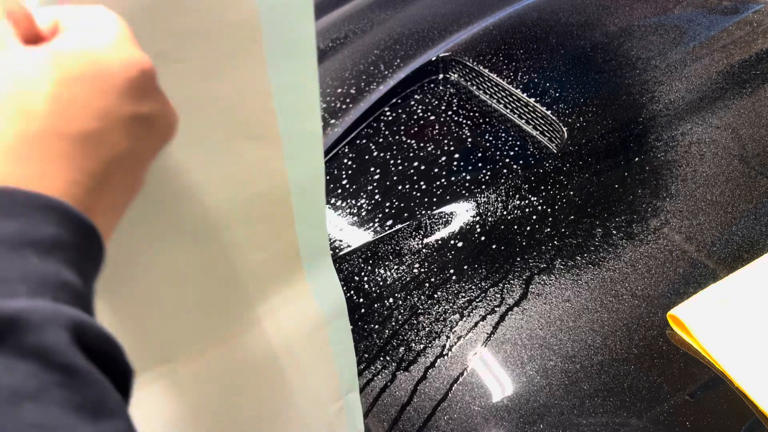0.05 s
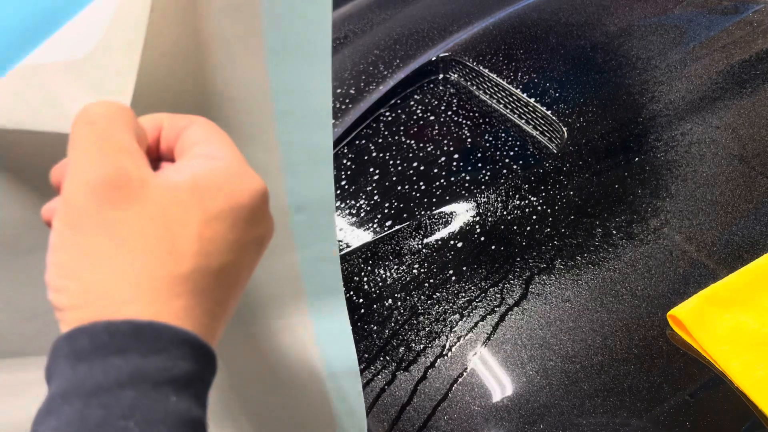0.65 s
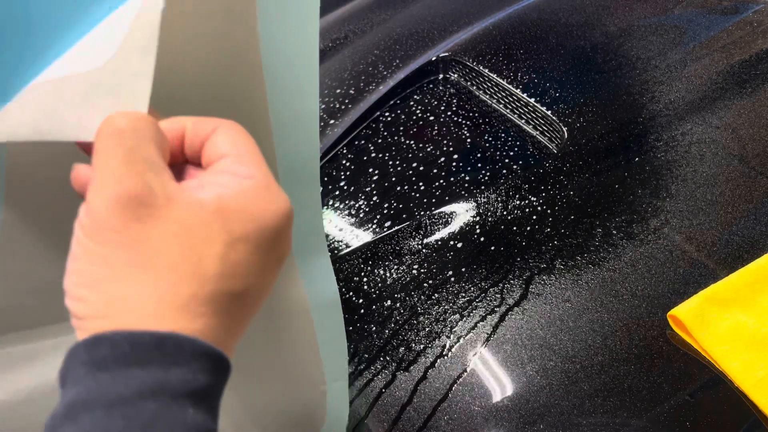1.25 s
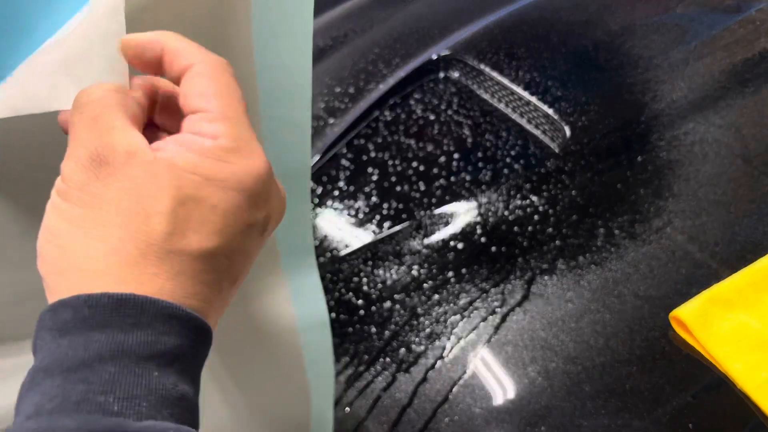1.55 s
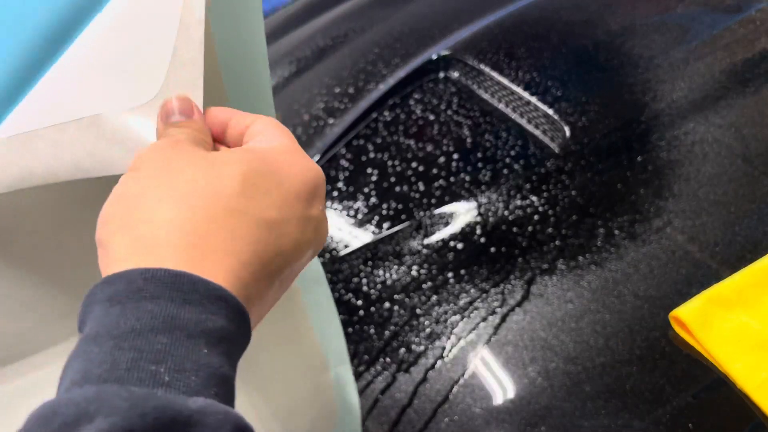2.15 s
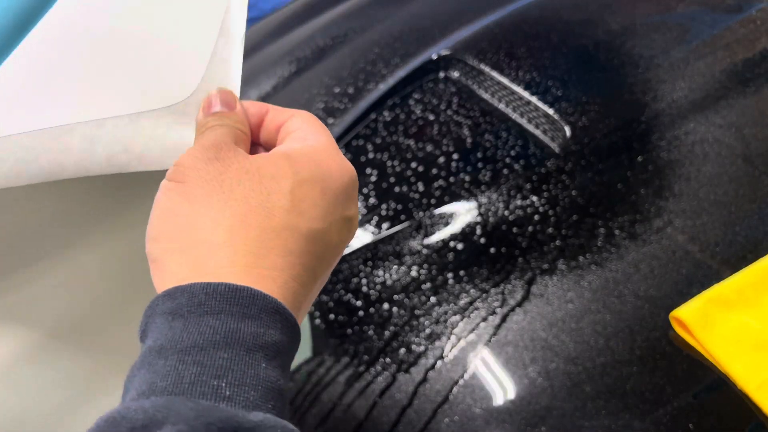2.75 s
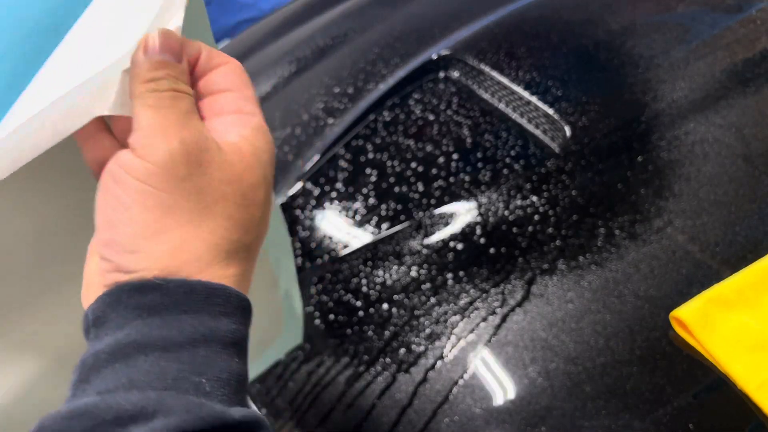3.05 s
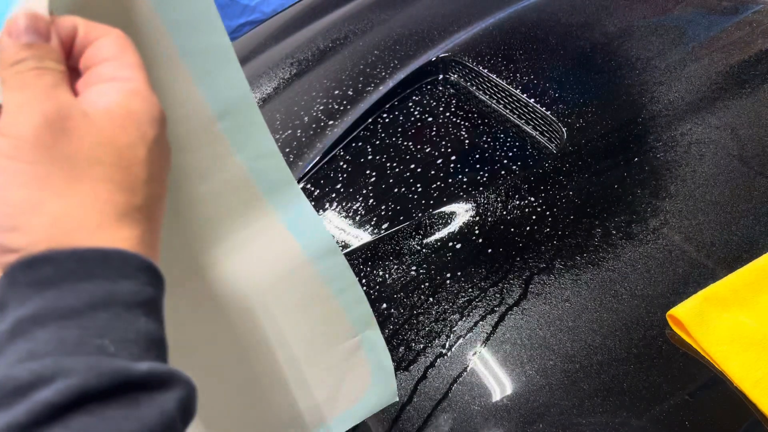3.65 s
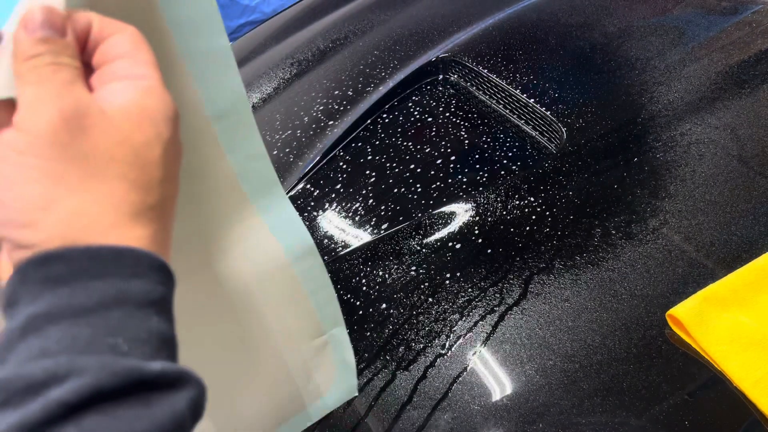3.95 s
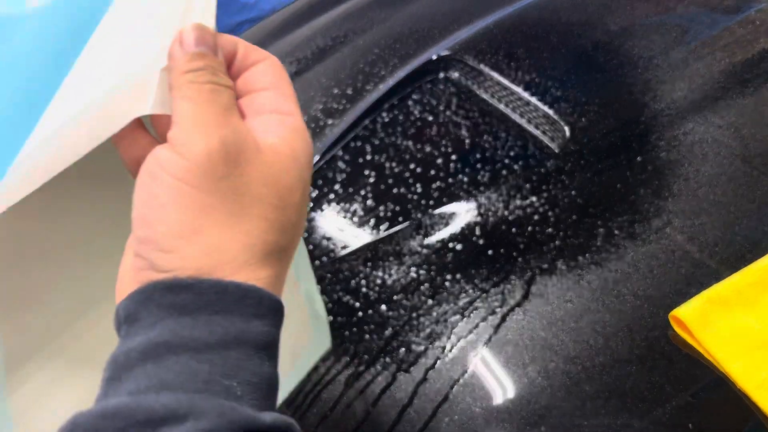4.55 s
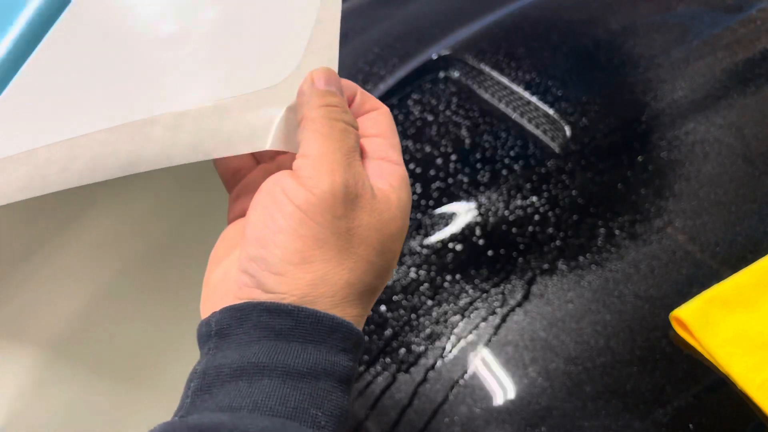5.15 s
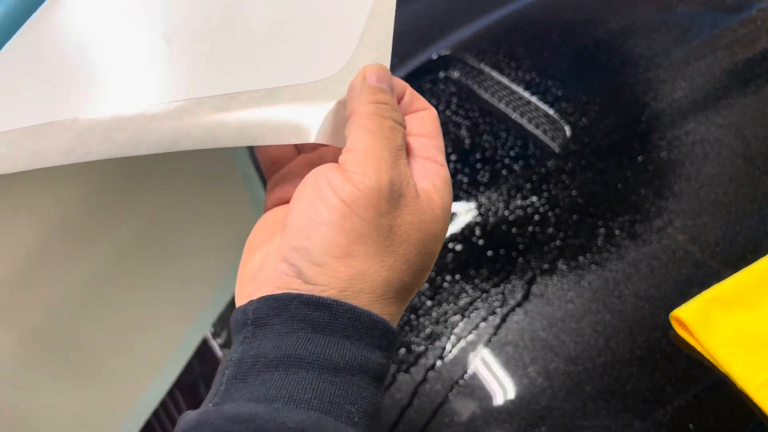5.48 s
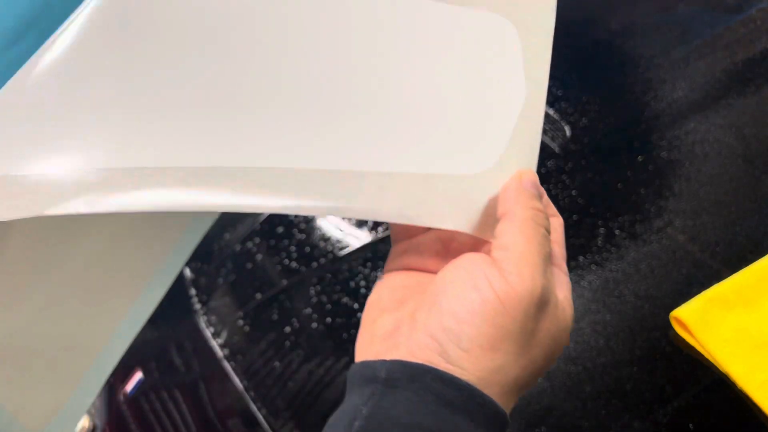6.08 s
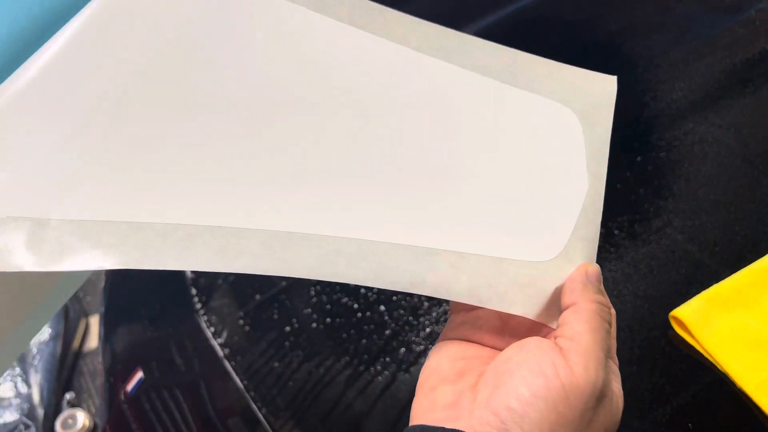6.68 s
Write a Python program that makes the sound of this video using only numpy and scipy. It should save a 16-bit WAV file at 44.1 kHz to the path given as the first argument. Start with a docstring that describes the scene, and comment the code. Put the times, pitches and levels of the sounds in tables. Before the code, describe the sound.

A large paper sheet rustles and snaps, then peels from adhesive vinyl in a long, ticking hiss, close up in a garage.

```python
"""Backing paper is peeled off sticky vinyl over a car panel in a garage; the left mic port is brighter.
Two long pulls (0.2-1.1 s, 1.9-2.9 s): glue parts in thousands of tiny pops that merge into a hiss,
while the hanging paper slides, flaps and buckles. A light tug and the sharpest snap follow at 3.1 s.
After another tug, the last pull (4.5-6.9 s) hisses loudest; glue spots tick, the slack sheet flutters.
Panel and garage answer throughout."""
import sys
import numpy as np
from scipy import signal
from scipy.fft import rfft, irfft, next_fast_len
from scipy.io import wavfile
from scipy.ndimage import map_coordinates

SR = 44100
rng = np.random.default_rng(int(sys.argv[2]) if len(sys.argv) > 2 else 0)


def output_pcm(signal):
    """Save a mono or channel-first signal as 16-bit PCM at the path in sys.argv[1].

    Samples are clipped to [-1, 1] before scaling.
    """
    pcm = np.clip(np.atleast_2d(signal).T, -1, 1) * 32767
    wavfile.write(sys.argv[1], SR, np.round(pcm).astype(np.int16))


N = 305172

# tone colours: (frequency [Hz], relative density [dB])
AIR_SPECTRUM = [(20, -11), (70, 5.5), (400, -7.5), (1200, -18.5), (3000, -22.5), (8000, -26.5),
                (12000, -36), (15000, -47)]
SWAY_SPECTRUM = [(20, -27.5), (45, -9.5), (70, -5), (125, -4.5), (220, -9.5), (500, -17), (2000, -60.5)]
RUSTLE_SPECTRUM = [(100, -17), (260, -1), (450, 3), (700, -0.5), (950, -0.5), (1400, 1), (2200, -6.5),
                   (4000, -39), (10000, -50)]
SLIDE_SPECTRUM = [(700, -25.5), (2000, 1.5), (3500, 2), (5200, 1), (6700, 0.5), (8500, -10.5), (12000, -13),
                  (16000, -34)]
SHEET_SPECTRUM = [(25, -38), (80, -5), (200, -3), (400, 1), (590, 4.5), (800, 5.5), (1400, 7), (2300, 7),
                  (3000, 6.5), (4200, 3), (5200, -2), (6100, -3.5), (6850, -3.5), (8500, -16),
                  (11600, -10.5), (13500, -17), (16000, -17)]
TICK_SPECTRUM = [(150, -11.5), (600, -5), (2000, 0), (4000, -2), (7000, -3), (10000, -6), (16000, 0.5)]
# tone colour of the peeling hiss, dips near 10 and 13.5 kHz: (frequency [Hz], relative density [dB])
HISS_SPECTRUM = [(150, -9), (500, -16), (1500, -4.5), (3500, -3), (6500, -1.5), (9000, 3.5), (10300, -2.5),
                 (11700, 7.5), (13500, 0), (15300, 5)]
# echo decay, shortest in the highest treble: (frequency [Hz], T60 [s])
ECHO_T60 = [(100, 0.38), (500, 0.27), (3000, 0.32), (7000, 0.28), (12000, 0.1), (14000, 0.061)]
# bands that garage and panel return more strongly: (centre [Hz], width [Hz], boost [dB])
ECHO_PEAKS = [(450, 60, 4.5), (837, 42, 2.5), (1327, 130, 3.5)]
# left port over right: (frequency [Hz], excess [dB])
PORT_EXCESS = [(60, 3.5), (250, 6.5), (700, 6.5), (1500, 5.5), (2500, 6), (4500, 9.5), (6800, 12.5),
               (8800, -3), (16000, 3)]
# right port behind left, near sound: (frequency [Hz], lag [cycles])
PORT_LAG = [(0, 0), (700, .42), (1500, .58), (2700, .66), (8000, 2), (16000, 0)]
# slack sheet shudders: (middle [s], half length [s], relative level [dB], centre [Hz], width [octaves])
FLUTTERS = [(3.085, 0.0095, -50, 290, 1), (4.468, 0.013, -54, 122, .4), (4.685, .02, -59, 111, 0.9),
            (5.169, 0.06, -67.5, 307, 0.41), (5.305, 0.014, -57.5, 395, 0.73),
            (5.51, 0.058, -63, 107, 0.22), (5.635, 0.017, -55.5, 620, 1), (5.738, 0.025, -54, 119.5, 0.082),
            (5.84, 0.044, -68, 58, .4), (5.885, 0.023, -64, 129, .25), (6.047, 0.023, -58.5, 240, 1),
            (6.413, 0.0069, -52.5, 516, 0.71), (6.452, 0.021, -60, 93, 0.76)]
# wide folds flap: (time [s], relative level [dB], pitch [Hz])
FLAPS = [(0.833, -36.5, 286), (1.007, -36.5, 290), (1.083, -36, 150), (1.114, -26.5, 286),
         (1.935, -46, 90.5), (1.975, -34, 310), (2.028, -44, 155), (2.998, -36, 201), (3.116, -25.5, 90),
         (4.018, -48.5, 120.2), (4.396, -35, 400), (4.46, -37.5, 215), (4.717, -32, 436)]
# paper brushes paper: (middle [s], half length [s], level [dB], crumple over rub [dB])
SWISHES = [(0.58, 0.032, -68, -2.5), (0.797, 0.0031, -55, 2), (1.165, 0.015, -63.5, -18),
           (1.343, 0.031, -72, -12), (1.43, 0.031, -64, -9), (1.792, 0.025, -68.5, -1.5),
           (1.905, 0.016, -62.5, 8.5), (3.092, 0.021, -55, 0.5), (3.421, 0.012, -74.5, -12),
           (3.97, 0.064, -84.5, -1.5), (4.24, 0.067, -77.5, 3), (4.341, 0.022, -53, -1),
           (4.55, 0.0036, -43, -10), (6.041, 0.023, -55, 2)]
# loose paper is moved: (start [s], end [s], relative level [dB], growth [dB], sway over rustle [dB])
MOVES = [(-0.05, 0.263, -53, -22.5, -14), (0.546, 1.436, -68, 4.5, -16.5), (1.903, 2.997, -62, -7, -3),
         (2.95, 3.151, -67, 17.5, 0), (3.208, 3.978, -69.5, -14.5, -5), (4.215, 4.8, -62, -6.5, 0),
         (4.75, 6.073, -71, 13, -6.5), (6.054, 6.92, -65.5, -3, -2)]
# tight bulges flip; level and tone are offset in buckles(): (time [s], level [dB], body [dB], edge [dB],
# crispness [dB], room send [dB], travel at 1 kHz [s], ring [Hz], left over right [dB])
BUCKLES = [(1.0037, -27, -10.5, -11, -3, -11.5, .0016, 730, 1),
           (1.068, -46.5, -6, -43, -42, -17, .008, 520, 0),
           (1.1104, -29.5, -13.5, -33.5, -29, -13, .003, 1300, 1),
           (1.444, -42, -14.5, -16, -5, -10.5, .0016, 1190, 1),
           (1.58, -56.5, -26, -17, -13, -12.5, .0025, 1400, 0),
           (1.673, -68.5, -4, -12, 4, 0, .0011, 910, -1), (1.918, -41, -21, -25, -3.5, -26, .0021, 1300, 1),
           (2.8, -37.5, -16, -18, -0.5, -10.5, .0022, 1420, .5),
           (2.8823, -51.5, -12, -22, -18, -17, .00092, 1400, 2.5),
           (2.992, -37.5, -10.5, -20, -33, -9, .0035, 820, 0.5),
           (3.0656, -45.5, -11, -13.5, 5.5, -4.5, .0011, 800, -1.5),
           (3.108, -19.5, -15, -18.5, 9.5, -5, .0007, 2330, -2.5),
           (3.107, -27, -9.5, -27, -26, -16, .004, 593, 4.5),
           (3.1128, -27, -11.5, -15, -4, -5.5, .001, 1000, -2.5),
           (3.73, -68.5, -27, -15.5, -2, -5.5, .00077, 2500, 3),
           (3.786, -52.5, -12, -22, -37, -7, .003, 1100, -2),
           (3.827, -51.5, -19.5, -40, -39, -14.5, .002, 1100, 0.5),
           (4.016, -44.5, -11, -19.5, -7.5, -7.5, .0022, 1680, -1),
           (4.39, -44.5, -8, -19, 1.5, -19, .0022, 520, 1),
           (4.4517, -33, -16.5, -23, -39, -12, .003, 1060, 0),
           (4.7122, -37.5, -5.5, -18.5, -18, -11, 0.00259, 1140, -0.5),
           (5.9892, -45.5, -12, -3, 15, -7.5, .001, 2600, -1.5),
           (6.403, -44.5, -8, -46, -39, -6, .0062, 520, -0.5)]
# sharp ticks: glue spots, and the big snap's bright crack at 3.108 s;
# both levels are offset in ticks(): (time [s], level [dB], sparkle [dB])
TICKS = [(0.2058, -42, -21), (0.913, -43, -26), (3.0885, -42, -25), (3.1083, -17.5, -17.5),
         (4.538, -41.5, -9), (4.543, -44, -6), (4.5485, -29.5, -14), (4.5498, -27.5, -18),
         (4.553, -39, -22), (4.611, -48, -9), (5.419, -41, -30), (5.6907, -38.5, -10.5), (5.986, -35, -14),
         (5.9887, -26, -15), (6.0203, -28, -24), (6.0572, -38, -19), (6.426, -33, -16.5),
         (6.6667, -34.5, -13), (6.842, -41.5, -8)]
# hand pulls: (start [s], end [s], slack take-up [s], relative level [dB], growth [dB], slide offset [dB])
PULLS = [(-0.05, 0.21, 0.017, -83.5, 0.5, 5.5), (0.182, 1.084, 0.044, -71.5, 4, -1),
         (1.944, 2.949, 0.03, -66.5, 0.5, 4), (3.067, 3.088, 0.0092, -66, 2.5, 3),
         (4.337, 4.478, 0.016, -66.5, -16, 10), (4.488, 6.905, 0.28, -58, -0.5, 3.2),
         (6.014, 6.037, 0.014, -60, 2, -12)]


def amp(db):
    """Decibels to gain."""
    return np.exp(np.asarray(db) * (np.log(10) / 20))


def along(points, hz):
    """(Hz, value) points read on a log axis."""
    knot_hz, values = np.transpose(points)
    return np.interp(np.log(hz + 1), np.log(knot_hz), values)


def wobble(rate_hz):
    """Random curve through Gaussian knots."""
    knots = rng.standard_normal(4096)
    return np.interp(np.arange(N) * rate_hz / SR, np.arange(len(knots)), knots)


def filtered(x, response):
    """x through the complex gain response(Hz)."""
    size = next_fast_len(N + SR // 4, True)
    return irfft(rfft(x, size) * response(np.fft.rfftfreq(size, 1 / SR)), size)[..., :N]


def coloured(x, spectrum):
    """x shaped by a spectrum, at rms 1."""
    shaped = filtered(x, lambda hz: amp(along(spectrum, hz)))
    return shaped / np.sqrt(np.mean(shaped ** 2) + 1e-20)


def pulse(level_db, size=4096):
    """Minimum-phase pulse with the spectrum level_db(Hz)."""
    cepstrum = irfft(np.log(amp(level_db(np.fft.rfftfreq(size, 1 / SR)))))
    cepstrum[1:size // 2] *= 2
    cepstrum[size // 2 + 1:] = 0
    return irfft(np.exp(rfft(cepstrum)))


def add(track, time_s, sound):
    """Mix a sound into the track."""
    part = track[..., round(time_s * SR):][..., :sound.shape[-1]]
    part += sound[..., :part.shape[-1]]


def pops(rate_hz, spread_db):
    """Random impulses of uneven size."""
    impulses = (rng.random(N) < rate_hz / SR) * rng.standard_normal(N)
    return impulses * amp(spread_db * np.clip(rng.standard_normal(N), -2, 2))


def air():
    """Quiet garage air, partly common to both ports."""
    return amp(-75.5) * coloured(rng.standard_normal((2, N)) + rng.standard_normal(N), AIR_SPECTRUM)


def reverberation(x, low_hz=150, cutoff_hz=8800, onset_s=.00065):
    """Dull, diffuse stereo echo, its highest treble cut off; the thin sheet sends out little bass."""
    hz, t, bins = signal.stft(rng.standard_normal((2, SR // 2)), SR, nperseg=256)
    coherence = .92 / (1 + (hz[:, None] / 330) ** 4)  # long waves reach both ports alike
    bins[1] = coherence * bins[0] + np.sqrt(1 - coherence ** 2) * bins[1]
    decay = amp(-60 * t / along(ECHO_T60, hz)[:, None])
    tail = signal.istft(bins * decay * (1 - np.exp(-t / onset_s)), SR, nperseg=256)[1]

    def colour(f):
        peaks_db = sum(db / (1 + (2 * (f - centre) / width) ** 2) for centre, width, db in ECHO_PEAKS)
        highpass = 1j * f / (low_hz + 1j * f)
        return amp(peaks_db) * highpass / np.sqrt(1 + (f / cutoff_hz) ** 10)

    return signal.fftconvolve(filtered(x, colour)[None], tail / np.linalg.norm(tail[0]), axes=1)[:, :N]


def direct(x, panel_db, off_axis=1, bounce_s=.0037):
    """Near sound plus its panel bounce; the right port lags, more so off axis."""
    lag = lambda cycles: np.exp(-2j * np.pi * cycles)
    bounce = lambda hz: 1 + amp(panel_db) * lag(hz * bounce_s) / (1 + 1j * hz / 7000)
    right = lambda hz: lag(off_axis * np.interp(hz, *np.transpose(PORT_LAG)))
    return filtered(x, lambda hz: bounce(hz) * np.array([np.ones(len(hz)), right(hz)]))


def garage(x, panel_db, room_db, off_axis=1):
    """Direct sound plus echoes whose paths shift with the moving sheet."""
    shift_rad = wobble(4)
    room = np.cos(shift_rad) * reverberation(x) + np.sin(shift_rad) * reverberation(x)
    return direct(x, panel_db, off_axis) + amp(room_db) * room


def flutters(size=32768):
    """The slack sheet shudders softly; its free length sets the noise band."""
    out, t = np.zeros(N), (np.arange(size) - size // 2) / SR
    for middle_s, half_s, db, centre_hz, width_oct in FLUTTERS:
        octaves = np.log2((np.fft.rfftfreq(size, 1 / SR) + 1) / centre_hz)
        band = np.exp(-(octaves / width_oct) ** 2 / 2)
        swell = np.exp(-(t / half_s) ** 2 / 2)
        shudder = swell * irfft(rfft(rng.standard_normal(size)) * band)
        shudder *= np.linalg.norm(swell) / np.linalg.norm(shudder)
        add(out, middle_s + t[0], amp(db + 3.5) * shudder)
    return out


def flaps(attack_s=.0033, decay_cycles=1.25, overtone_db=-7.5):
    """A fold swings over, pushing air for a few uneven cycles; its stiff crease adds a rough overtone."""
    out, t = np.zeros(N), np.arange(SR // 6) / SR
    for time_s, db, hz in FLAPS:
        stretch = np.array([map_coordinates(rng.standard_normal(128), [hz * t]) for _ in range(2)])
        fold_rad, crease_rad = 2 * np.pi * np.cumsum(hz * np.exp(.3 * stretch), axis=1) / SR
        swing = np.sin(fold_rad) + amp(overtone_db) * np.sin(1.8 * crease_rad)
        envelope = (1 - np.exp(-t / attack_s)) * np.exp(-hz * t / decay_cycles)
        add(out, time_s, amp(db + 1) * swing * envelope)
    # air slips round the edge: the slowest motion is silent
    return filtered(out, lambda hz: (1j * hz / (45 + 1j * hz)) ** 2)


def swishes():
    """Paper brushes paper briefly and crumples a little."""
    out, t = np.zeros(N), np.arange(N) / SR
    rub = coloured(pops(rate_hz=4300, spread_db=.5), SLIDE_SPECTRUM)
    crumple = coloured(pops(rate_hz=2200, spread_db=2), RUSTLE_SPECTRUM)
    for middle_s, half_s, db, crumple_db in SWISHES:
        swell = 1 / (1 + ((t - middle_s) / half_s) ** 4)
        out += amp(db) * (rub + amp(crumple_db) * crumple) * swell
    return out


def stroke(start_s, end_s, db, growth_db, attack_s, release_s):
    """Gain of one hand movement: attack, ramp in dB, release."""
    t = np.arange(N) / SR
    rise = 1 - np.exp(-np.maximum(t - start_s, 0) / attack_s)
    fall = np.exp(-np.maximum(t - end_s, 0) / release_s)
    return amp(db + np.interp(t, [start_s, end_s], [0, growth_db])) * rise * fall


def move_gains():
    """Envelopes of rustle and slow sway."""
    motion, swing = np.zeros((2, N))
    for start_s, end_s, db, growth_db, sway_db in MOVES:
        move = stroke(start_s, end_s, db, growth_db, attack_s=.087, release_s=.03)
        motion += move
        swing += amp(sway_db) * move
    return motion, swing


def pull_gains():
    """Envelopes of parting glue and dragged paper."""
    glue, drag = np.zeros((2, N))
    for start_s, end_s, take_up_s, db, growth_db, slide_db in PULLS:
        pull = stroke(start_s, end_s, db, growth_db, attack_s=take_up_s, release_s=.027)
        glue += pull
        drag += amp(slide_db) * pull
    return glue, drag


def handling():
    """Loose paper slides over itself when pulled or moved; moves also rustle and sway it."""
    _, drag = pull_gains()
    motion, swing = move_gains()
    slide = coloured(pops(rate_hz=5900, spread_db=7.5), SLIDE_SPECTRUM)
    slide *= (drag + amp(-13.5) * motion) * amp(-4.5 + wobble(43))
    rustle = coloured(pops(rate_hz=2500, spread_db=2), RUSTLE_SPECTRUM)
    rustle *= motion * amp(.5 + 1.2 * wobble(30))
    sway = coloured(rng.standard_normal(N), SWAY_SPECTRUM) * swing * amp(.5 + 1.4 * wobble(26))
    return slide + rustle + sway


def ripple(t60_s, ring_db, size=4096):
    """A kick, then scattered bending waves, too damped to favour a pitch; unit energy."""
    waves = rng.standard_normal(size) * amp(-60 * np.arange(size) / SR / t60_s)
    waves *= amp(ring_db) / np.linalg.norm(waves)
    waves[0] += 1
    spectrum = rfft(waves)
    waves = irfft(spectrum / np.sqrt(np.abs(spectrum)))[:size // 2]  # partly whitened
    return waves / np.linalg.norm(waves)


def dispersed(x, travel_s, size=8192):
    """Bending waves speed up with root frequency, so treble leads; travel_s holds at 1 kHz."""
    hz = np.fft.rfftfreq(size, 1 / SR)
    phase_rad = 4 * np.pi * travel_s * np.sqrt(1000 * hz)
    return irfft(rfft(x, size) * np.exp(-1j * phase_rad))[:size // 2]


def buckles(hollow_db=4.5, width_oct=.2, rebound_db=-16, rebound_s=.0016):
    """A bulge flips with a crack and a hollow ring: brighter if tight, a longer chirp if far off."""
    cracks, waves, room = np.zeros((3, 2, N))
    for time_s, db, body_db, edge_db, crisp_db, room_db, travel_s, ring_hz, pan_db in BUCKLES:
        tilt = [(600, body_db + 18), (1300, 0), (3400, edge_db + 12),
                (6500, crisp_db - .5), (13000, crisp_db - 4.5)]
        hollow = lambda hz: hollow_db / (1 + (np.log2((hz + 1) / ring_hz) / width_oct) ** 2)
        flip = amp(db + 25.5) * pulse(lambda hz: along(SHEET_SPECTRUM, hz) + along(tilt, hz) + hollow(hz))
        crack = dispersed(flip, travel_s)
        add(crack, rebound_s, amp(rebound_db) * dispersed(flip, 1.7 * travel_s))  # back from the rim
        pan = amp(pan_db * np.array([[.5], [-.5]]))
        add(cracks, time_s, pan * signal.fftconvolve(crack, ripple(t60_s=.018, ring_db=0)))
        add(waves, time_s, pan * signal.fftconvolve(crack, ripple(t60_s=.078, ring_db=19.5)))
        add(room, time_s, pan * amp(room_db) * reverberation(crack))
    lingering_bass = amp(-5) * filtered(waves, lambda hz: 1 / (1 + 1j * hz / 1200))
    return direct(cracks + lingering_bass, panel_db=-20.5) + room


def ticks():
    """Sharp ticks: glue spots giving way at once, and the bright crack of the big paper snap."""
    out = np.zeros(N)
    for time_s, db, sparkle_db in TICKS:
        shelf = [(4000, .005), (11000, sparkle_db + 19)]
        click = pulse(lambda hz: along(TICK_SPECTRUM, hz) + along(shelf, hz))
        add(out, time_s, amp(db + 16) * signal.fftconvolve(click, ripple(t60_s=.006, ring_db=6)))
    return out


def peel():
    """Glue threads break along an unevenly advancing line; thicker ones snap singly."""
    glue, _ = pull_gains()
    crackle = coloured(pops(rate_hz=6500, spread_db=.6), HISS_SPECTRUM)
    grip_db = .7 * wobble(7) + 1.3 * wobble(25) + 1.3 * wobble(260)
    thick_threads = amp(-10.5) * coloured(pops(rate_hz=50, spread_db=6), HISS_SPECTRUM)
    return (crackle + thick_threads) * glue * amp(8.5 + grip_db)


def scene():
    """Paper and glue in the garage, over its air."""
    return (air() + buckles()
            + garage(peel(), panel_db=-32, room_db=-.5)
            + garage(handling() + swishes(), panel_db=-7.5, room_db=-2)
            + garage(flaps() + flutters(), panel_db=-11, room_db=-15)
            + garage(ticks(), panel_db=-4.5, room_db=-4.5, off_axis=.59))


def record(dry):
    """Near microphone: left port louder and brighter, both band-limited."""
    top_hz = 15900
    band = lambda hz: .5 - .5 * np.tanh((hz - top_hz) / 120)
    return filtered(dry, lambda hz: amp(np.outer([.5, -.5], along(PORT_EXCESS, hz))) * band(hz))


dry = scene()
out = record(dry)
output_pcm(out)
```